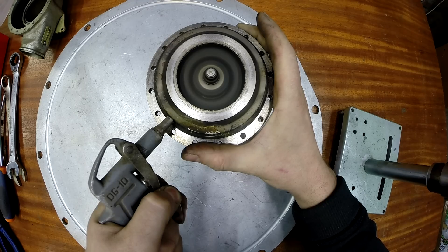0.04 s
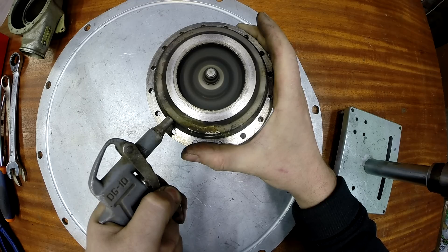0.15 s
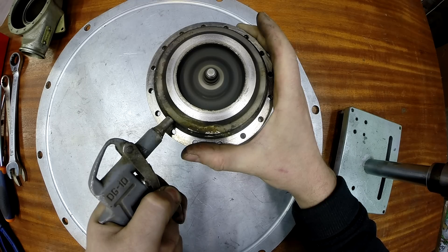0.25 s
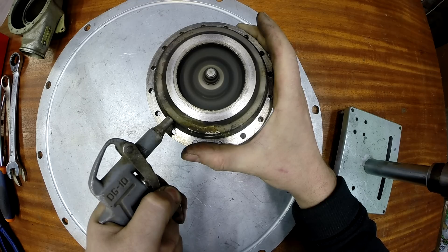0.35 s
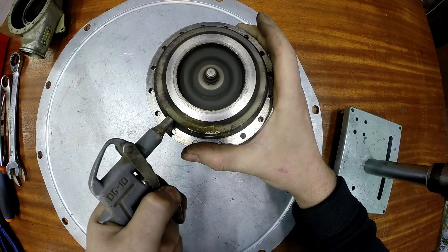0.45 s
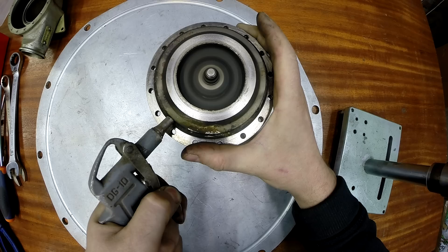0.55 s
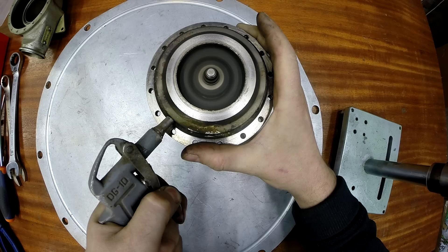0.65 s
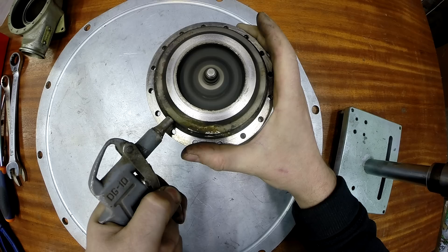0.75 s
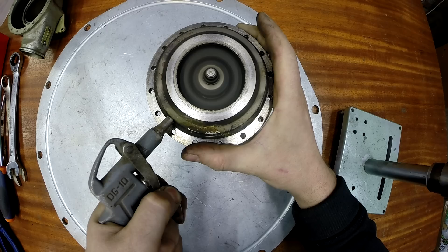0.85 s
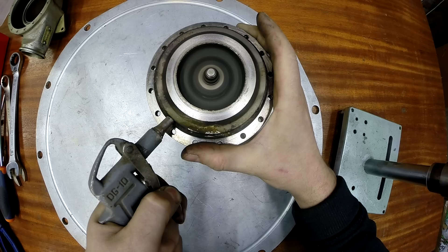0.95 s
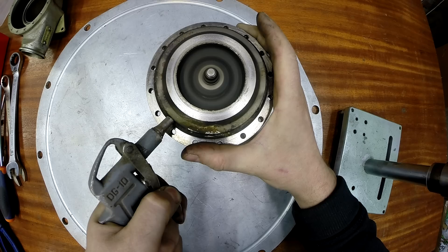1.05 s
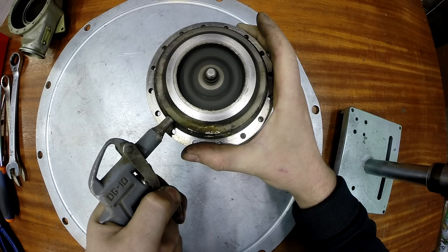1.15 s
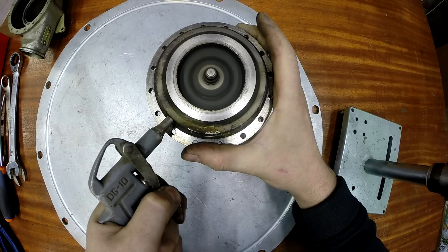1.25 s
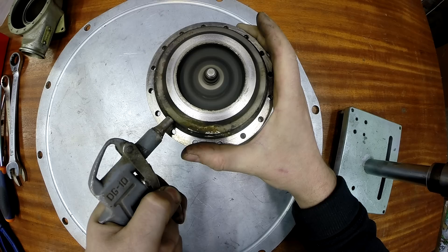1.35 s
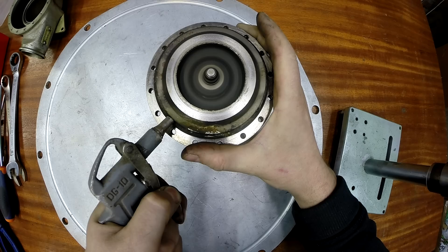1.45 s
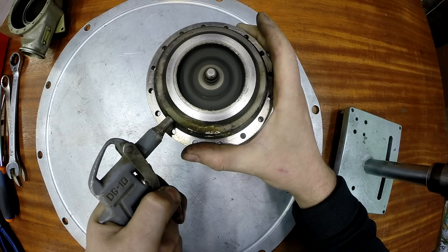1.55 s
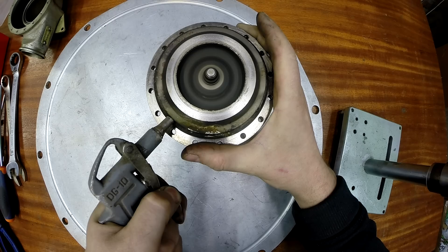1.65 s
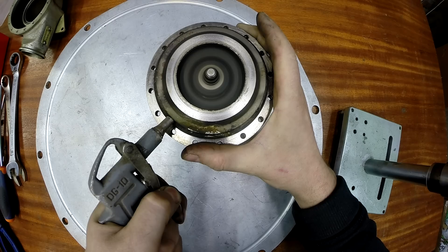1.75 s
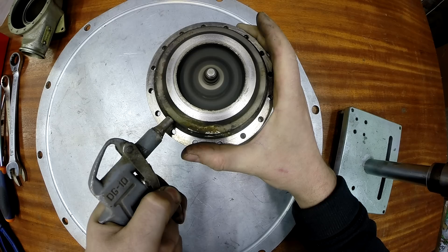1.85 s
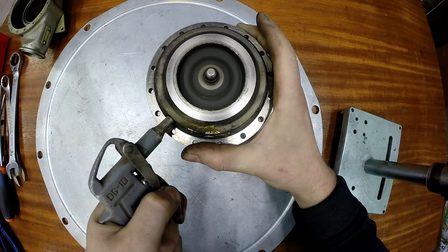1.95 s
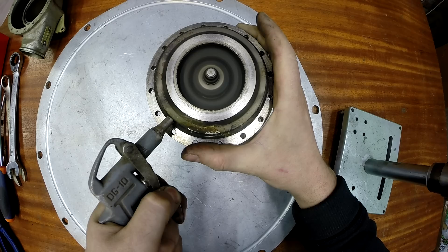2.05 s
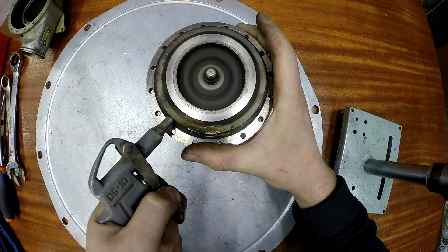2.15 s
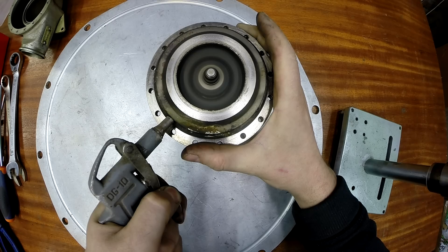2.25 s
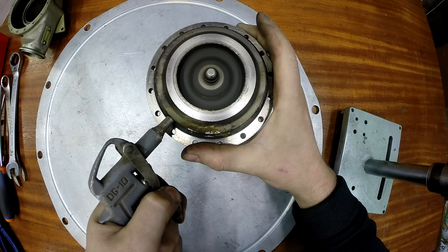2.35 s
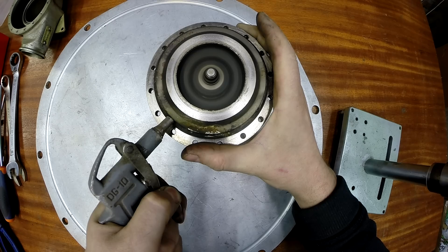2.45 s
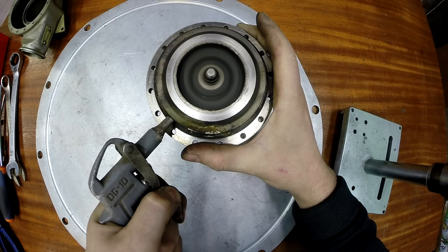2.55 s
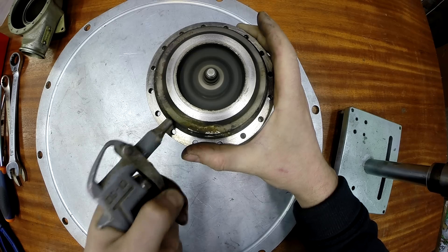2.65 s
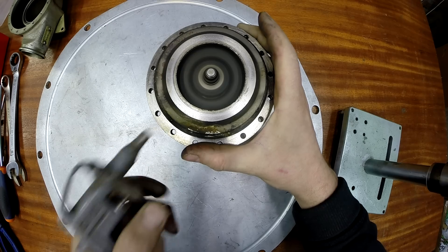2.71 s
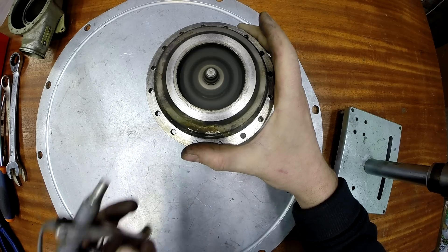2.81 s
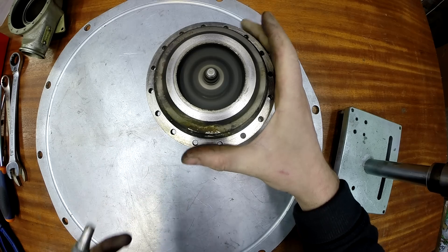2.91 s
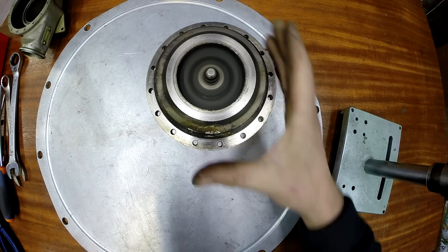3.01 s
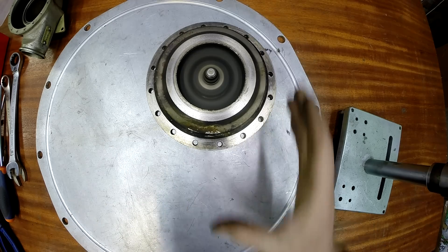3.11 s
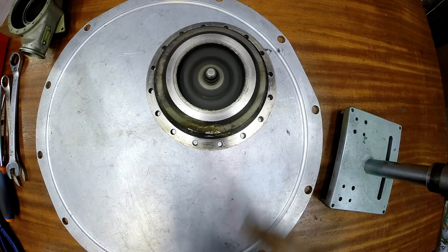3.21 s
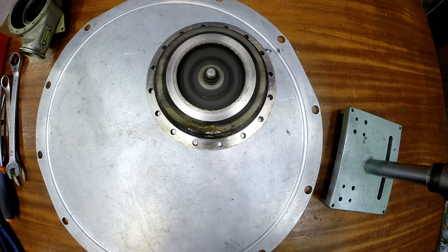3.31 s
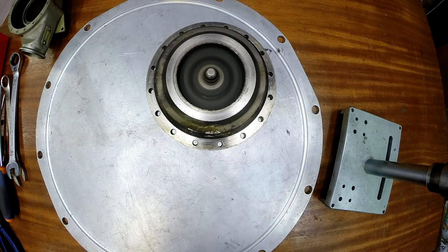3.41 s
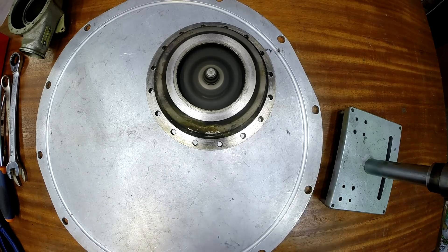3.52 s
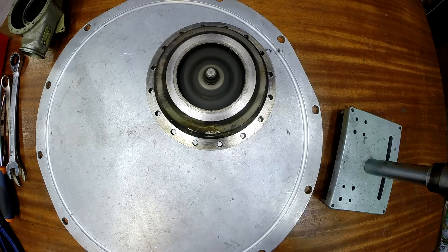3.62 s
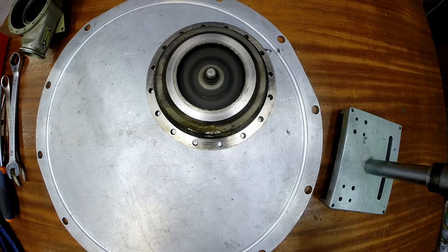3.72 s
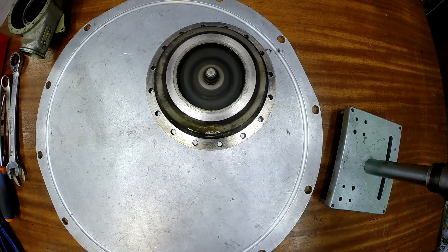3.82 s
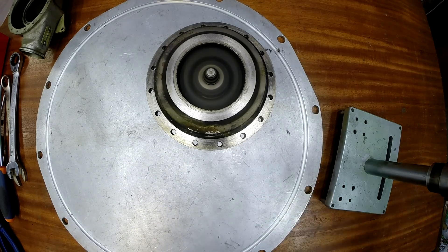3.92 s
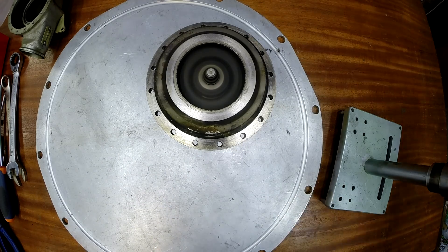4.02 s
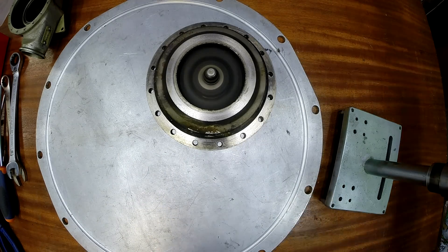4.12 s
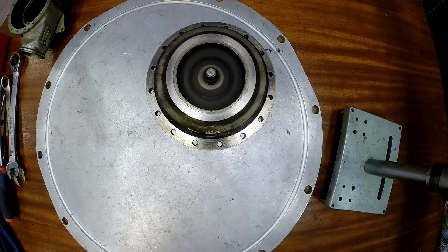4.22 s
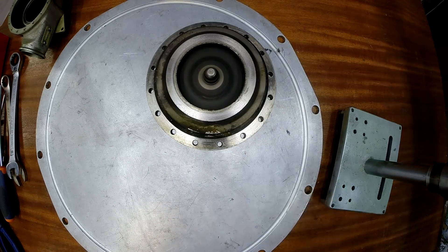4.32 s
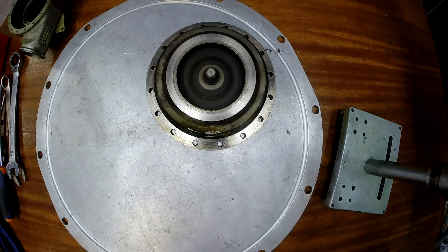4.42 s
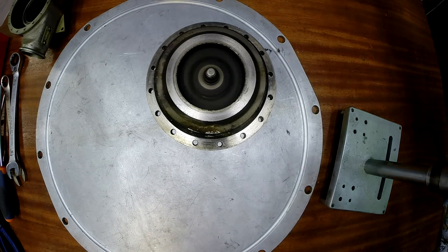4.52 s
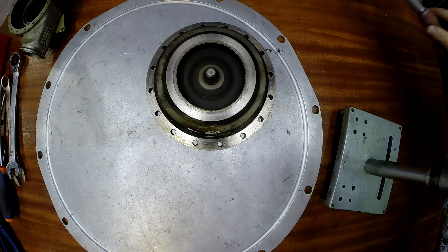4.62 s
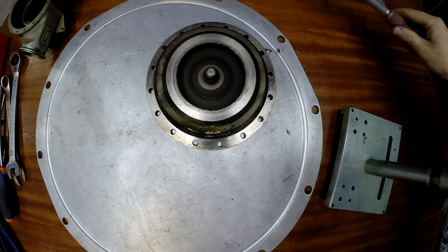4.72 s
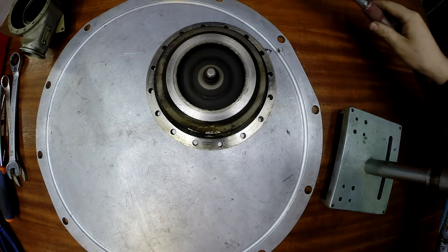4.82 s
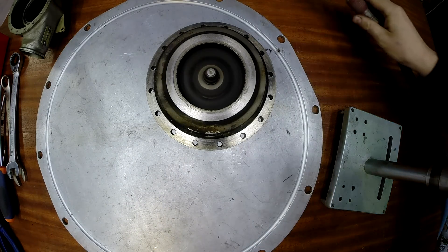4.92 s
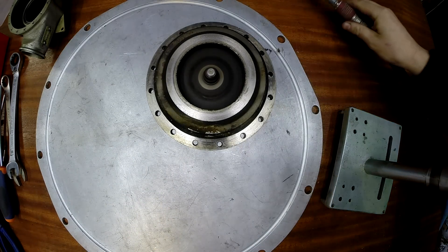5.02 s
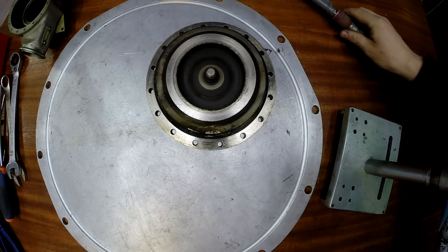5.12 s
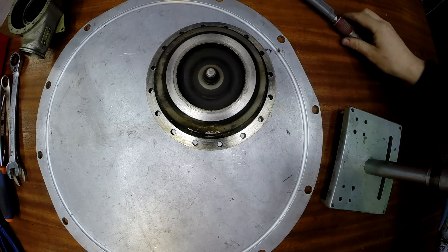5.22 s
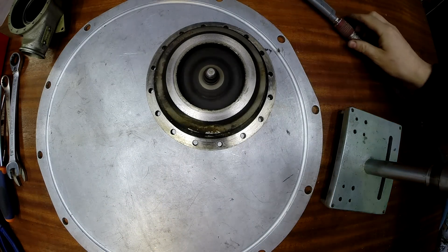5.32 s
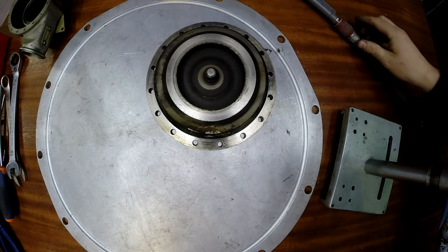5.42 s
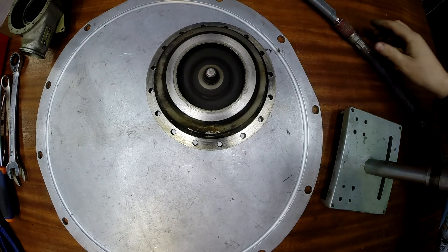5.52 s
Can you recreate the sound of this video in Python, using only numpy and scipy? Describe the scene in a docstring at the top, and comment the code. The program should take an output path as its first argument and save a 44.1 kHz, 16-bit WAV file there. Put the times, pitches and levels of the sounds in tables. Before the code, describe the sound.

Close up in a small workshop, a blow gun hisses loudly and brightly into a small turbine wheel, with a thin whine creeping upward beneath. After nearly three seconds the air cuts off quickly, leaving the wheel coasting with a descending hum and grainy bearing rattle that swells as the hand lets go. Near the end, a tool being picked up gives soft thuds, light ticks and a faint clink. Close, mono-like microphone, little echo.

```python
"""First a jet of air hisses from a blow gun, and the small turbine wheel it drives whines higher and higher.
The trigger is let go and the wheel coasts down: its shaking sweeps through the ringing tones of an
aluminium plate on the workbench, while its bearings rattle. Near the end a tool is picked up: three
knocks on the bench, a few light ticks and a clink. Hiss and rattle are shaped noise, the whines are
sines locked to the turning wheel, and the knocks are short pushes that ring the bench and plate."""
import sys
import numpy as np
from scipy import signal
from scipy.fft import rfft, irfft, next_fast_len
from scipy.io import wavfile
from scipy.ndimage import map_coordinates

SR = 44100
rng = np.random.default_rng(int(sys.argv[2]) if len(sys.argv) > 2 else 0)


def file_out(sig):
    """Save sig as 16-bit WAV at sys.argv[1]."""
    # one column per channel
    cols = np.atleast_2d(sig).T
    # limit, then scale
    lim = np.clip(cols, -1, 1)
    pcm = np.round(lim * 32767).astype(np.int16)
    wavfile.write(sys.argv[1], SR, pcm)


N = 245195
TIME = np.arange(N) / SR  # s

# quiet background noise of the room: f/Hz, relative level/dB
ROOM_TONE = [(20, -23.5), (45, -12.5), (90, -6.5), (140, 4), (300, -9.5), (2000, -12.5), (15000, -36)]
# how long the room's answer takes to fall by 60 dB: f/Hz, t60/s
ROOM_DECAY = [(100, 0.49), (600, 0.18), (3000, 0.77), (12000, 0.038)]
# light contacts of the steel tool: t/s, tick level/dB, ring level/dB
TICKS = [(4.704, -40, -78), (4.751, -36, -64), (4.774, -40, -64), (4.809, -37, -69), (4.821, -44, -75),
         (5.124, -54, -45.5)]
# colour of the ticks: f/Hz, relative level/dB
TICK_SPECTRUM = [(1000, 5), (3500, 4.5), (6000, -14), (9000, -7), (12000, -21), (15000, -29)]
# ringing tones of the steel: f/Hz, relative level/dB, t60/s
STEEL = [(6300, 2, 0.099), (6918, -15, .12), (7397, -13, .12), (8190, 5.5, 0.12), (8425, -9, .14),
         (10000, -5, 0.11), (12900, -16, 0.16)]
# blows on the bench: t/s, relative bench level/dB, relative plate level/dB, contact cut-off f/Hz,
# relative crack level/dB
KNOCKS = [(4.543, -19, -16, 646, -44.5), (4.553, -23.5, -34, 350, -59), (4.577, -23, -28, 298, -57),
          (5.082, -32, -14.5, 1090, -33), (5.0886, -24, -30, 1100, -36), (5.1, -31, -21, 1000, -35.5),
          (5.2313, -21, -31, 600, -35.5), (5.234, -7.5, -18, 624, -35), (5.256, -8.5, -15, 560, -48)]
# colour of the crack in each blow: f/Hz, relative level/dB
CRACK_SPECTRUM = [(100, 1), (450, 16), (1150, 12.5), (1600, -3), (3500, -11.5), (4800, -21), (7000, -12),
                  (9500, -29), (15000, -52)]
# modes (ringing tones) of the bench top: f/Hz, width/Hz, relative level/dB
BENCH = [(43.3, 3.5, -7), (60, 4, -8), (74.6, 7, -0.5), (103, 13, -1), (150, 50, -8.5), (207, 31, -5),
         (320, 55, 0.5), (360, 44, 6), (420, 74, -3), (453, 15, 1), (498, 66, 4), (600, 57, -1),
         (627, 14, -4), (800, 63, -13)]
# modes of the plate: f/Hz, width/Hz, relative level/dB
PLATE = [(147, 6.4, -5.5), (206, 3.8, -11), (236, 14, -12.5), (263.6, 5, -9.5), (314, 87, -16),
         (409, 16, -13.5), (462.4, 18, -5.5), (526.5, 11.5, -16.5), (554, 3.7, -28), (651.4, 9.9, 0),
         (753, 25, 0), (885.3, 40.5, 5.5), (950, 9.9, -0.5), (996.4, 21, 3), (1068, 68, 1.5),
         (1110, 40, -5), (1317, 9, -17), (1334, 31, -9.5), (1450, 27, -23)]
# broad colour of the bearing rattle: f/Hz, relative level/dB
RATTLE_SPECTRUM = [(40, -7), (200, -7), (600, 2), (1300, -0.5), (2400, -11), (3200, -7.5), (5000, -9.5),
                   (6200, -14.5), (8400, -16.5), (9700, -30.5), (11600, -50), (13600, -32), (15300, -47)]
# resonances of the housing: f/Hz, width/Hz, boost level/dB
HOUSING = [(1076, 240, 11.5), (1907, 143, 17.5), (2848, 170, 15.5), (3612, 330, 11), (4355, 110, 9),
           (6736, 85, 11), (6937, 170, 20.5), (7570, 250, 9.5), (8060, 160, 11.5), (10990, 270, 25)]
# tones of the rolling balls: multiple of the wheel speed, relative level/dB
BALLS = [(6.62, -35), (8.05, -20), (9.09, -6.5), (10.1, -2.5), (12.1, -2), (13.08, -11), (14.03, -14),
         (15.06, -1), (17.04, 0.5), (18.05, 1), (19.05, -5), (20.1, 2.5), (24.1, 10)]
# broad colour of the ball tones: f/Hz, relative level/dB
BALL_SPECTRUM = [(1200, 7.5), (1500, 3), (1800, -1.5), (2250, 5.5), (2700, -18), (4000, -13)]
# ring of the outer race, the track of the balls: f/Hz, width/Hz, boost level/dB
RACE = [(1892, 16, 11)]
# orders (tones locked to the shaft) that shake the plate: multiple of the wheel speed, relative level/dB
ORDERS = [(1.0, -6), (2.0, 5.5), (2.9, -14), (3.0, 2.5), (4.0, 0.5), (4.42, -13), (5.0, -3.5), (6.0, -6.5),
          (7.0, -5.5), (8.0, -9), (9.0, -3), (10.0, -18.5)]
# cavity that strengthens the free whine: f/Hz, width/Hz, boost level/dB
WHINE_CAVITY = [(2130, 110, 22)]
# whine of the driven wheel: multiple of the wheel speed, level relative to the hiss/dB
WHINE = [(7.19, -15), (9.12, -11), (18.24, -17.5)]
# broad colour of the jet: f/Hz, relative level/dB
JET_SPECTRUM = [(60, -51), (250, -18.5), (600, -15), (900, -9.5), (2300, 0.5), (2800, -5.5), (5100, -7.5),
                (5500, 2.5), (8500, 2), (10500, -0.5), (11500, -4.5), (13200, -3.5), (13800, -13),
                (15300, -13.5)]
# cavities that the jet blows across: f/Hz, width/Hz, boost level/dB
CAVITIES = [(888, 111, -7.7), (929, 431, 16.6), (1168, 146, 2.2), (1557, 94, 4.1), (1761, 81, 5.0),
            (1912, 74, 7.1), (2125, 43, 2.5), (3364, 119, 5.0), (3565, 430, 9.6), (4136, 92, 6.3),
            (4730, 320, 7.4), (5577, 94, 3.4), (5923, 240, 3.9), (6238, 55, 2.7), (6636, 136, 4.4),
            (6831, 69, 6.2), (7055, 85, 7.0), (7257, 61, 4.9), (7777, 251, 4.6), (8038, 133, 6.6),
            (8240, 84, 5.6), (8455, 103, 3.4), (9036, 62, 4.6), (9239, 49, 3.5), (9480, 80, 3),
            (10300, 60, 3), (10500, 60, 3), (10700, 60, 3), (10865, 89, 5.4), (12707, 81, 4.1)]

TOP_HZ = 15350  # nothing is kept from here up
TICK_RISE_S = .003  # the tool slides briefly into each contact
# driven wheel: first speed (turns per s), climb (turns per s each s), top speed (turns per s)
START_SPEED, SPIN_UP, TOP_SPEED = 249.6, 7.65, 265.7
# coasting: start (s), dry friction (turns per s each s), time constant of the drag (s)
COAST_S, FRICTION, DRAG_S = 2.704, 15.52, 3.2
# jet: level (dB), when the trigger is let go (s), time for a 60 dB fall from then (s)
JET_DB, TRIGGER_OFF_S, JET_T60 = -18.5, 2.676, 0.16
WHINE_FADE_DB = 0.98  # thrust lost for each turn per s gained (dB)
WHINE_POWER = 0.45  # the whine grows as this power of the thrust
JET_PUSH_DB = 4  # extra shaking at full thrust (dB)
# faint whine that outlasts the air: level before the cavity (dB), t60 (s)
FREE_WHINE_DB, FREE_WHINE_T60 = -45.5, 1.36
# a hand holds and damps the housing: when it starts to lift off, and how long that takes (s)
HAND_OFF_S, HAND_LIFT_S = 2.597, 0.71
REFERENCE_SPEED = 200  # turns per s
# vibrations: level at the reference speed (dB), power of the speed, change while held (dB)
SHAKE_DB, SHAKE_POWER, SHAKE_HELD_DB = -32.5, 0.96, -8.5
RATTLE_DB, RATTLE_POWER, RATTLE_HELD_DB = -33, 1.8, -10.5


def amp(db):
    """Turn decibels into gain."""
    return 10 ** (np.asarray(db) / 20)


def unit(x):
    """Scale to rms 1."""
    return x / np.sqrt(np.mean(x ** 2) + 1e-20)


def along(points, hz):
    """Read a curve of (f/Hz, value) points on a log frequency axis."""
    f, v = np.transpose(points)
    return np.interp(np.log(hz + 1), np.log(f), v)


def wobble(rate):
    """A smooth random curve with rate knots a second."""
    return map_coordinates(rng.standard_normal(1000), [TIME * rate], mode="wrap")


def filtered(x, response):
    """Pass x through a filter given as a function of frequency."""
    size = next_fast_len(N + SR // 2)
    spectrum = rfft(x, size) * response(np.fft.rfftfreq(size, 1 / SR))
    return irfft(spectrum, size)[..., :N]


def humps(peaks, f):
    """Decibels that resonances add at the frequencies f."""
    return sum(db / (1 + (2 * (f - hz) / width) ** 2) for hz, width, db in peaks)


def colour(spectrum, peaks=()):
    """A filter with a broad spectrum and resonant humps on it."""
    return lambda f: amp(along(spectrum, f) + humps(peaks, f))


def body(modes, flip=1):
    """A filter of ringing modes; with flip = -1 neighbouring modes swing in opposite phase."""
    def response(f):
        total = 0
        for k, (hz, width, db) in enumerate(modes):
            damping = 1j * f * width
            total = total + flip ** k * amp(db) * damping / (hz * hz - f * f + damping)
        return total
    return response


def noise(response):
    """Coloured noise of rms 1."""
    return unit(filtered(rng.standard_normal(N), response))


def release(s, t60):
    """An envelope that holds until s and then dies away."""
    return amp(-60 * np.clip((TIME - s) / t60, 0, 2))


def burst(s, t60):
    """An envelope that starts at s and dies away."""
    return (TIME >= s) * release(s, t60)


def tones(turns, orders, waver_db, slip, rate):
    """Tones locked to the shaft, each wavering in level and slipping in phase (radians)."""
    total = 0
    for k, db in orders:
        level = amp(db + waver_db * wobble(rate))
        phase = 2 * np.pi * (k * turns + rng.random()) + slip * wobble(rate)
        total = total + level * np.sin(phase)
    return total


def wheel_speed():
    """Turns per second: a steady climb to top speed, then a coast against friction and drag."""
    driven = np.minimum(START_SPEED + SPIN_UP * TIME, TOP_SPEED)
    left = np.exp(-np.maximum(TIME - COAST_S, 0) / DRAG_S)
    return driven * left - FRICTION * DRAG_S * (1 - left)


def jet_thrust(speed):
    """Push on the blades: 1 at first, less as the wheel catches up, dying once the trigger is let go."""
    catching_up = amp(-WHINE_FADE_DB * np.maximum(speed - START_SPEED, 0))
    return catching_up * release(TRIGGER_OFF_S, JET_T60)


def vibration(speed, level_db, power, held_db):
    """Gain of a vibration that grows with speed and is damped while the hand holds the housing."""
    grip = 1 - np.clip((TIME - HAND_OFF_S) / HAND_LIFT_S, 0, 1)
    return amp(level_db + held_db * grip) * (speed / REFERENCE_SPEED) ** power


def room_tone():
    """A steady, quiet noise behind everything."""
    return amp(-57.0) * noise(colour(ROOM_TONE))


def workshop(x):
    """The room's answer to x: a tail of noise in which each pitch fades at its own rate."""
    hz, t, z = signal.stft(rng.standard_normal(SR // 2), SR, nperseg=256)
    fade = amp(-60 * t / along(ROOM_DECAY, hz)[:, None])
    tail = signal.istft(z * fade, SR, nperseg=256)[1]
    return signal.fftconvolve(x, tail / np.linalg.norm(tail))[:N]


def steel_tool():
    """Light contacts make ticks of noise and ring the steel, most strongly in one clink."""
    contacts = 0
    for s, tick_db, _ in TICKS:
        rise = np.clip((TIME - s) / TICK_RISE_S, 0, 1)
        contacts = contacts + amp(tick_db) * burst(s, t60=0.072) * rise
    sound = contacts * noise(colour(TICK_SPECTRUM))
    t = np.arange(SR // 4) / SR
    ring = sum(amp(db - 60 * t / t60) * np.sin(2 * np.pi * hz * t) for hz, db, t60 in STEEL)
    ring = ring * np.minimum(t / TICK_RISE_S, 1)
    for s, _, ring_db in TICKS:
        sound[round(s * SR):][:len(t)] += amp(ring_db) * ring
    return sound


def knocks():
    """Each blow rings bench and plate; a softer contact pushes for longer and sounds duller."""
    bench, plate, crack = np.zeros((3, N))
    for s, bench_db, plate_db, contact_hz, crack_db in KNOCKS:
        push = np.exp(-.5 * np.clip(2 * np.pi * contact_hz * (TIME - s), -10, 10) ** 2)
        push /= push.sum()
        bench += amp(bench_db + 36.5) * push
        plate += amp(plate_db + 39.0) * push
        crack += amp(crack_db + 13) * burst(s, t60=0.052)
    # struck far from the centre, so neighbouring modes swing in opposite phase
    thud = filtered(bench, body(BENCH, flip=-1)) + filtered(plate, body(PLATE, flip=-1))
    return thud + filtered(crack * rng.standard_normal(N), colour(CRACK_SPECTRUM))


def bearings(speed, turns, size=256):
    """Balls roll over rough races that feel partly the same at every turn, and ring the housing."""
    # one row of size bumps per turn, each row partly repeating the row before
    races = signal.lfilter([1], [1, -.42], rng.standard_normal((2000, size)), axis=0)
    rolling = unit(map_coordinates(races.ravel(), [turns * size], order=3))
    # the loose wheel chatters once a turn, and the level wanders
    rolling *= (1 + 0.083 * np.sin(2 * np.pi * turns)) * amp(0.59 * wobble(28))
    # the ball tones weaken as the wheel slows; each flares as it falls through the ring of the race
    ball_gain = amp(-13.5) * (speed / REFERENCE_SPEED) ** 0.51
    balls = ball_gain * tones(turns, BALLS, waver_db=1.5, slip=0.081, rate=24)
    balls = filtered(balls, colour(BALL_SPECTRUM, RACE))
    rattle = unit(filtered(rolling + balls, colour(RATTLE_SPECTRUM, HOUSING)))
    return vibration(speed, RATTLE_DB, RATTLE_POWER, RATTLE_HELD_DB) * rattle


def shaft(speed, turns):
    """The wheel's shaking swells each time one of its orders crosses a mode of the plate."""
    shaking = tones(turns, ORDERS, waver_db=1.6, slip=0.042, rate=27)
    shaking = shaking * amp(JET_PUSH_DB * jet_thrust(speed))
    return filtered(vibration(speed, SHAKE_DB, SHAKE_POWER, SHAKE_HELD_DB) * shaking, body(PLATE))


def free_whine(turns):
    """The main whine outlasts the air, and swells as it falls through a cavity's resonance."""
    main_order = WHINE[1][0]
    tone = np.sin(2 * np.pi * main_order * turns)
    tone = amp(FREE_WHINE_DB) * release(TRIGGER_OFF_S, FREE_WHINE_T60) * tone
    return filtered(tone, lambda f: amp(humps(WHINE_CAVITY, f)))


def air_jet(speed, turns):
    """Turbulent hiss across the wheel's cavities and the driven whine, until the trigger is let go."""
    hiss = noise(colour(JET_SPECTRUM, CAVITIES)) * amp(0.24 * wobble(26.34))
    whine = jet_thrust(speed) ** WHINE_POWER * tones(turns, WHINE, waver_db=1, slip=.1, rate=8.6)
    return amp(JET_DB) * release(TRIGGER_OFF_S, JET_T60) * (hiss + whine)


def scene():
    """Room, handling noises, wheel and jet, added up and sent equally to both channels."""
    speed = wheel_speed()
    turns = np.cumsum(speed) / SR
    handling = steel_tool() + knocks()
    background = room_tone() + amp(-3.5) * workshop(handling)
    wheel = bearings(speed, turns) + shaft(speed, turns) + free_whine(turns)
    mono = background + handling + wheel + air_jet(speed, turns)
    return np.array([mono, mono])


def record(dry):
    """Keep only the frequencies below the top limit."""
    return filtered(dry, lambda f: f < TOP_HZ)


dry = scene()
out = record(dry)
file_out(out)
```